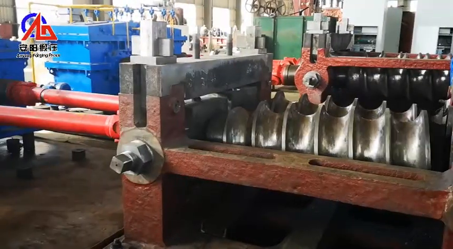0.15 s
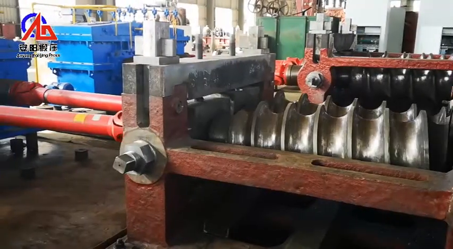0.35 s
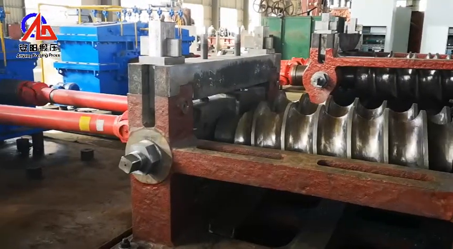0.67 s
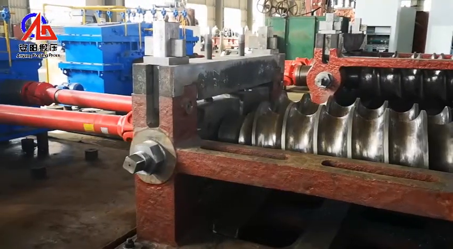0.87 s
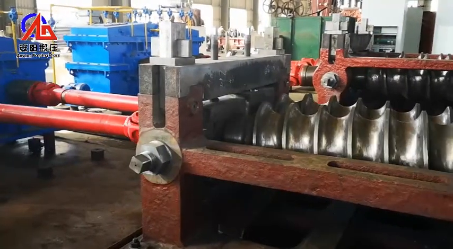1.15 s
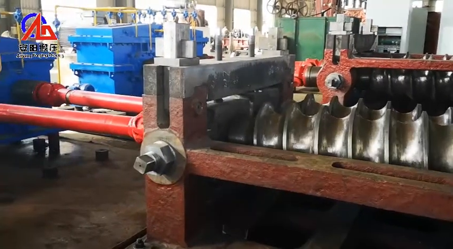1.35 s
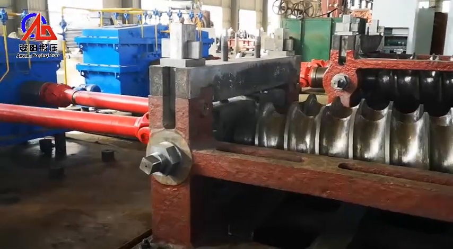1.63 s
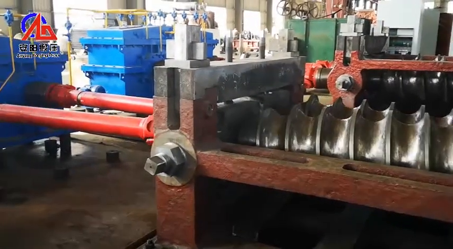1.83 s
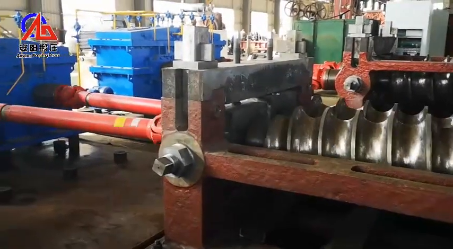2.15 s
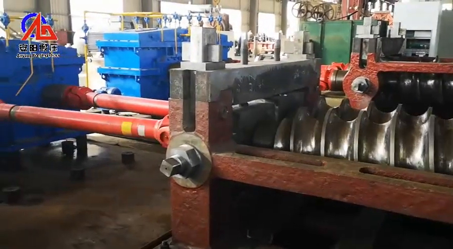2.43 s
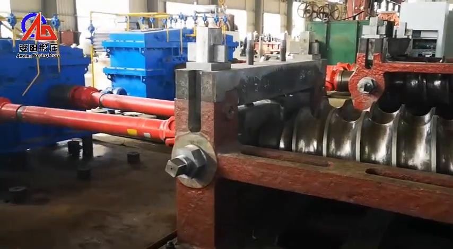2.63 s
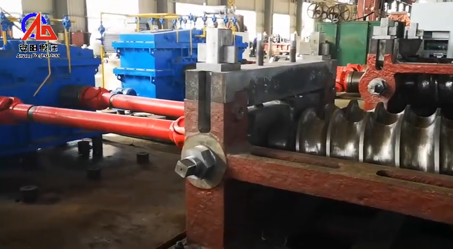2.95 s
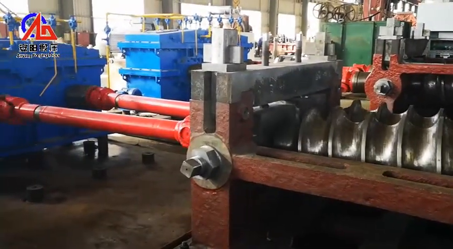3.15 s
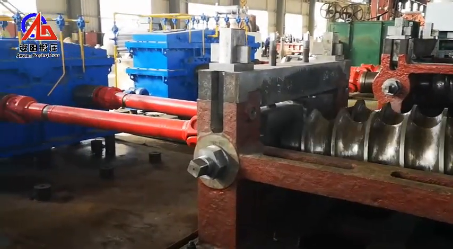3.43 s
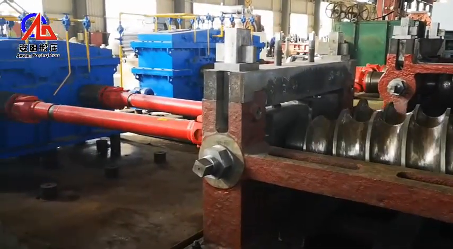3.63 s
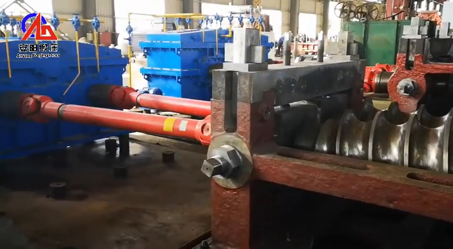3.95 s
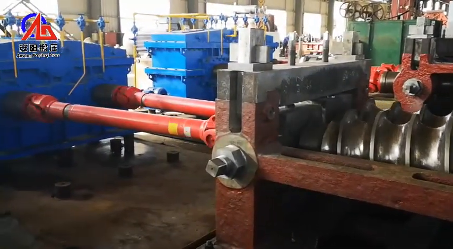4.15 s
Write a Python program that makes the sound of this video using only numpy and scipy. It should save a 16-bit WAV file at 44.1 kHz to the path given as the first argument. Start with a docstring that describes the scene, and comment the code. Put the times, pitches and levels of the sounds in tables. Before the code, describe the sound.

A continuous low mechanical drone with strong electric hum and throbbing gears, heard close beside the machine in a workshop. Gritty steel rubbing swells at each bite of the rolls, slightly to the right, while short chattering knocks ring and die quickly. A steady high whine and wavering whistle sit above, with a soft buzzing hiss on the left. The whine brightens in the second half, knocks thin out, and the mill keeps running.

```python
"""A skew rolling mill for steel balls is already turning steadily in a factory workshop, its gearbox droning.
The motor hums, the drive whines, a thin hiss comes from the left, and the rolls churn on the right.
From 0.12 s the rolls bite about four times a second; loose steel knocks against them from 0.2 s.
The hiss flares once near 0.8 s. The whine's octave is faint around 1 s and swells after 2.3 s.
Knocks grow rarer after 3.2 s, and the mill is still turning at the end."""
import sys
import numpy as np
from scipy import signal
from scipy.fft import rfft, irfft
from scipy.io import wavfile
from scipy.ndimage import uniform_filter1d, map_coordinates

SR = 44100
rng = np.random.default_rng(int(sys.argv[2]) if len(sys.argv) > 2 else 0)


def dump(signal):
    """Clip the signal to [-1, 1] and save it as 16-bit WAV at the path in sys.argv[1]."""
    limited = np.clip(np.atleast_2d(signal).T, -1, 1)
    pcm = np.round(limited * 32767).astype(np.int16)
    wavfile.write(sys.argv[1], SR, pcm)


N = 189056
TIME = np.arange(N) / SR
MAINS_HZ = 50
TURN_S = .24   # one turn of the gear wheel


def from_db(db):
    """Turn decibels into a gain."""
    return 10 ** (np.asarray(db) / 20)


def rms_one(x):
    """Scale to an rms (average strength) of 1."""
    return x / np.sqrt(np.mean(np.abs(x) ** 2) + 1e-20)


def level(curve):
    """Turn a curve of start_s, level_db into a gain for every sample."""
    return from_db(np.interp(TIME, *np.transpose(curve)))


def swells(rows, width_s):
    """Gain that changes smoothly around the time in each row of peak_s, change_db."""
    return from_db(sum(db * np.exp(-((TIME - s) / width_s) ** 2) for s, db in rows))


def at_hz(points, hz):
    """Read a table between its points, with pitch spaced as the ear hears it (logarithmic)."""
    x, y = np.transpose(points)
    return np.interp(np.log(hz + 1e-3), np.log(x), y)


def coloured(x, spectrum):
    """Pass x through a body with this spectrum, falling steeply beyond its ends; rms 1."""
    hz = np.fft.rfftfreq(N, 1 / SR) + 1e-3
    lowest_hz, highest_hz = spectrum[0][0], spectrum[-1][0]
    skirts = np.minimum(1, np.minimum(hz / lowest_hz, highest_hz / hz)) ** 4
    gain = from_db(at_hz(spectrum, hz)) * skirts
    return rms_one(irfft(rfft(x) * gain, N))


def evened(x, span_s):
    """Hold the level of x steady over spans of this length."""
    power = uniform_filter1d(np.mean(x ** 2, axis=0), max(int(span_s * SR), 64))
    return x / np.sqrt(power + 1e-12)


def pan(left_db):
    """Gains of the left and right channels; a positive value favours the left."""
    return from_db(np.array([[.5], [-.5]]) * left_db)


def balanced(pair, balance):
    """Tilt each frequency to the left or right."""
    return irfft(rfft(pair) * pan(at_hz(balance, np.fft.rfftfreq(N, 1 / SR))), N)


def from_right(x, lag_ms=0.581, shadow_hz=3000):
    """Sound from the right reaches the left microphone later and duller."""
    dulled = signal.sosfilt(signal.butter(1, shadow_hz, fs=SR, output="sos"), x)
    return np.array([np.interp(TIME - lag_ms / 1000, TIME, dulled), x])


# How alike the hall's sound is at both ears: pitch_hz, likeness (0-1, no unit)
HALL_LIKENESS = [(30, 0.96), (120, 1), (250, 0.89), (380, 0.74), (550, 0), (900, 0.0071)]


def diffuse(pair):
    """Spread two unrelated signals around as in a hall: alike at both ears in the bass only."""
    alike = at_hz(HALL_LIKENESS, np.fft.rfftfreq(N, 1 / SR))
    mid, side = rfft(pair)
    return irfft(np.sqrt(1 + alike) * mid + np.sqrt(1 - alike) * side * [[1], [-1]], N)


def drift(per_s):
    """Smooth random wander of rms 1."""
    knots = rng.standard_normal(1024)
    wander = map_coordinates(knots, [TIME[::32] * per_s * 2], order=3, mode="wrap")
    return rms_one(wander).repeat(32)[:N]


def tone(hz, unsteady, lead=0, waver_per_s=2.966):
    """A steady or gliding tone that wavers in strength and phase; the left ear leads by lead (radians)."""
    wander = drift(waver_per_s) + 1j * drift(waver_per_s)
    waver = rms_one(1 + unsteady * wander / np.sqrt(2))
    turns = np.cumsum(hz * np.ones(N)) / SR + rng.random()
    line = waver * np.exp(2j * np.pi * turns)
    return np.sqrt(2) * (line * np.exp(1j * lead * np.array([[.5], [-.5]]))).real


def tones(rows, step_hz):
    """A set of tones, each moved to the nearest whole multiple of a step."""
    total = 0
    for hz, db, left_db, lead, unsteady in rows:
        locked_hz = step_hz * round(hz / step_hz)
        total = total + from_db(db) * pan(left_db) * tone(locked_hz, unsteady, lead)
    return total


def mains_buzz():
    """A noisy electric buzz, repeated every mains cycle."""
    cycle = rng.standard_normal((2, round(SR / MAINS_HZ)))
    return cycle[:, np.arange(N) % cycle.shape[1]]


ROLL_TURN_S = .2585   # one turn of the rolls
FIRST_BITE_S, BITE_RISE_S = 0.12, 0.11   # the rolls bite once a turn: when first, and how fast load builds


def under_load(swing_db, lag_s):
    """Gain that follows the load: it builds quickly at each bite and eases over the rest of the turn."""
    age = (TIME - FIRST_BITE_S - lag_s) % ROLL_TURN_S
    load = np.interp(age, [0, BITE_RISE_S, ROLL_TURN_S], [0, 1, 0])
    return from_db(swing_db * (load - .5))


# Colour of the hiss, before it is scaled to its level: pitch_hz, strength_db
HISS_COLOUR = [(2800, -8.5), (3900, 5), (4700, -0.5), (5600, -1.5), (6400, -5), (7100, -1), (7700, 0),
               (8200, -4), (9000, -14), (9600, -10)]
FLARE_S, FLARE_WIDTH_S, FLARE_DB = .79, .018, 4.5


def hiss(level_db=-56.0, buzz_db=-8):
    """Thin noise on the drive side, with an electric buzz every mains cycle; it flares once, briefly."""
    left, right = rng.standard_normal((2, N)) + from_db(buzz_db) * mains_buzz()
    duller_right = signal.lfilter([1], [1, -.55], right)
    sides = np.array([coloured(left, HISS_COLOUR), coloured(duller_right, HISS_COLOUR)])
    flare_db = FLARE_DB * np.exp(-((TIME - FLARE_S) / FLARE_WIDTH_S) ** 2)
    return from_db(level_db + flare_db) * pan(left_db=15.5) * sides


WHINE_HZ = 2311.6   # switching pitch of the drive
# The microphone moves through the standing waves of the whine: start_s, left_right_db, left_lead_rad
WHINE_PLACE = [(.2, -3, -1.7), (.6, -3, -2.4), (.9, 5, -2.6), (1.6, 4, -2.4), (2.3, -4, -3.1),
               (3.0, 7, -1.7), (3.4, 3, -.8), (3.7, -7, -1.3), (4.1, -7, -1.4)]
# Overtones of the whine: multiple (of its pitch), level_db (rms), left_right_db, left_lead_rad,
# unsteadiness (0-1)
WHINE_OVERTONES = [(3, -64, 5.5, 3.8, 0.6), (3.5, -72, 16, 5, 0.4)]
# Rise and fall of the whine's octave, before its trim: start_s, level_db
OCTAVE_LEVEL = [(0, -61), (.35, -57), (.7, -59), (1.0, -68), (1.45, -67), (1.65, -61), (2.05, -60),
                (2.3, -57.5), (2.65, -52.5), (3.3, -49.5), (4.29, -52)]
# Rise and fall of the whine's fourth multiple: start_s, level_db
FOURTH_LEVEL = [(0, -75), (.3, -70.5), (.9, -72), (1.1, -76), (2.0, -84), (2.7, -74), (3.7, -84),
                (4.29, -80)]
# Rise and fall of the high whistle, before its trim: start_s, level_db
WHISTLE_LEVEL = [(.05, -60.5), (.25, -60.5), (.45, -64), (.62, -59.5), (.79, -61.5), (.96, -56),
                 (1.06, -68), (1.2, -61.5), (1.62, -70), (1.75, -59.5), (1.92, -62), (2.1, -65),
                 (2.38, -59.5), (2.7, -63.5), (3.02, -59), (3.17, -69), (3.45, -63), (3.55, -68),
                 (3.75, -62), (3.94, -74), (4.1, -57), (4.29, -66)]
# Wandering pitch of the high whistle: start_s, pitch_hz
WHISTLE_PITCH = [(.15, 7339), (.4, 7329), (.7, 7338), (.95, 7334), (2.13, 7334), (2.22, 7351), (2.5, 7353),
                 (2.75, 7330), (3.75, 7332), (4.29, 7335)]


def drive(pitch_db=-45.0, octave_trim_db=0.5, whistle_trim_db=-2.0):
    """Switching makes a whine that shifts between the ears, with uneven overtones and a wandering whistle."""
    place_s, *columns = np.transpose(WHINE_PLACE)
    left_db, lead = (np.interp(TIME, place_s, column) for column in columns)
    whine = from_db(pitch_db) * pan(left_db) * tone(WHINE_HZ, unsteady=0, lead=lead)

    overtone_rows = [(multiple * WHINE_HZ, *rest) for multiple, *rest in WHINE_OVERTONES]
    overtones = tones(overtone_rows, WHINE_HZ / 2)

    octave = tone(2 * WHINE_HZ, unsteady=0.14, lead=2.7, waver_per_s=9.0)
    octave = from_db(octave_trim_db) * level(OCTAVE_LEVEL) * pan(left_db=8.5) * octave
    fourth = level(FOURTH_LEVEL) * pan(left_db=6) * tone(4 * WHINE_HZ, unsteady=.25)

    whistle_hz = np.interp(TIME, *np.transpose(WHISTLE_PITCH))
    whistle = tone(whistle_hz, unsteady=0.18, waver_per_s=9.0)
    whistle = from_db(whistle_trim_db) * level(WHISTLE_LEVEL) * pan(left_db=12.0) * whistle
    return whine + overtones + octave + fourth + whistle


# Mains hum: pitch_hz, level_db (rms), left_right_db, left_lead_rad, unsteadiness (0-1)
HUM = [(50, -48.5, 0, 0, .1), (150, -36, 0, 0, .4), (200, -46.5, 0, 0, .3), (400, -49.5, -5, -.9, .4),
       (1200, -64, -5, .9, .3), (1400, -61, 2, .4, .3), (1500, -55, 2, -1.4, .3), (1750, -59.5, 1, -.2, .3),
       (1800, -53, 1, .2, .4), (1850, -62, -10, -.6, .4), (2000, -54, -5, -1.8, .2),
       (5200, -80, 20, -1.6, .2)]
# Tones of shafts and gears, moved to the nearest multiple of the wheel's turning rate when played:
# pitch_hz, level_db (rms), left_right_db, left_lead_rad, unsteadiness (0-1)
GEAR_TONES = [(25, -41.6, 0, 0, .12), (46, -44, 0, 0, .3), (79, -45, 0, 0, .5), (96, -46.5, 0, 0, .3),
              (146, -46, 0, 0, .4), (162, -46.5, 0, 0, .4), (167, -46.5, 0, 0, .4), (179, -44.5, 0, 0, .3),
              (204, -46.5, 0, 0, .4), (212, -47, 0, 0, .5), (225, -45, 0, 0, .4), (246, -46, 0, .3, .4),
              (333, -45.3, 0, 0, .3), (425, -58, 6, -.2, .2), (438, -58, -5, .3, .2), (517, -54, 7, -2, .3),
              (721, -63, 15, 1.1, .2), (1333, -64, 1, -.2, .3), (2475, -58.5, -3, 1.5, .5),
              (3671, -66, -2, .4, .6), (4325, -72.5, 4, -.2, .3), (4400, -73, 0, -.7, .3),
              (4925, -75.5, 20, -1.4, .2)]
# Rise and fall of the hum's fifth harmonic, before its trim: start_s, level_db
FIFTH_LEVEL = [(.1, -33), (.45, -35), (.8, -39.5), (1.7, -41), (2.3, -37.5), (3.0, -37.5), (4.29, -37.5)]
# Rise and fall of the hum's sixth harmonic, before its trim: start_s, level_db
SIXTH_LEVEL = [(.1, -33), (.25, -38), (.38, -34.5), (.55, -49.5), (1.65, -53.5), (2.2, -42.5), (2.5, -40.5),
               (3.3, -36.5), (4.25, -36)]


def motor(fifth_trim_db=2.5, sixth_trim_db=2.0):
    """Magnetic hum on multiples of the mains, with a changing fifth and sixth, plus shaft and gear tones."""
    fifth = from_db(fifth_trim_db) * level(FIFTH_LEVEL) * tone(5 * MAINS_HZ, unsteady=0.099)
    sixth = from_db(sixth_trim_db) * level(SIXTH_LEVEL) * tone(6 * MAINS_HZ, unsteady=0.35)
    return fifth + sixth + tones(HUM, MAINS_HZ) + tones(GEAR_TONES, 1 / TURN_S)


def band(x, low_hz, high_hz):
    """Keep only the sound between two pitches."""
    return signal.sosfilt(signal.butter(2, [low_hz, high_hz], "band", fs=SR, output="sos"), x)


# What the rattling steel rings with: pitch_hz, strength_db, t60_s (time to fade by 60 dB)
STEEL = [(1080, -10.5, .07), (1830, -7, .04), (1906, -9.5, .04), (2020, -7.5, .027), (2330, -0.5, 0.059),
         (2562, 2, 0.05), (2642, -1.5, 0.06), (2985, 2.5, 0.031), (3074, -6.5, 0.039), (3316, 2, 0.05),
         (3425, -2.5, 0.051), (3620, -9.5, 0.052), (4200, -16.5, 0.057)]


def steel_ring(contacts):
    """Each contact sets the steel's resonances ringing, and they die away."""
    rings = 0
    for k, (hz, db, t60_s) in enumerate(STEEL):
        decay = from_db(-60 / (t60_s * SR))   # per sample
        angle = 2 * np.pi * hz / SR
        feedback = [1, -2 * decay * np.cos(angle), decay * decay]
        sign = (-1) ** k
        rings = rings + sign * from_db(db) * signal.lfilter([1, 0, -1], feedback, contacts)
    return rings


# Knocks of steel on the rolls: start_s, level_db (rms of the first 40 ms, before panning and echo),
# chatter_s, clatter_db (dull clatter against the ring)
RATTLES = [(.208, -36.5, 0.02, 2), (0.264, -50, .014, 3), (.448, -39.5, 0.017, 3.5),
           (.689, -36.5, 0.015, 8), (.73, -44, .014, -3), (.905, -42, .012, 6), (.974, -33.5, 0.0068, -1.5),
           (0.983, -37, 0.011, -4), (1.008, -45, 0.023, 12), (1.085, -38, 0.0097, -4),
           (1.22, -38.5, .012, 1), (1.247, -39.5, 0.018, 3.5), (1.529, -35.5, 0.02, -2),
           (1.565, -37, 0.011, 3.5), (1.7636, -38, 0.0097, -3), (1.8082, -39, 0.014, 0),
           (2.044, -36, 0.013, -3.5), (2.291, -41, .012, -1), (2.3181, -36.5, 0.01, -0.5),
           (2.364, -39, .012, -10), (2.4, -43, .015, -8), (2.559, -36.5, .012, 3), (2.581, -38.5, 0.011, 7),
           (2.775, -39.5, .011, -2), (2.9231, -36.5, .012, 1.5), (3.028, -40, 0.014, -1),
           (3.16, -40, 0.013, 0), (3.57, -41.5, .012, -2), (4.046, -34.5, 0.011, -1.5),
           (4.09, -37, .012, -7)]
RATTLE_TOP_HZ, DULLING_OCT_PER_DB = 3900, .055   # top at 0 dB of clatter; more clatter lowers it


def rattle(body_hz=2150, crack_db=-4, crack_hz=3300, hall_db=-10.5, hall_t60_s=0.4):
    """Knocks are short chatters of contacts that crack, clatter on guides, ring steel and echo in the hall."""
    age = TIME[:SR // 6]
    chatter_s = np.array(RATTLES)[:, 2:3]
    shape = (len(RATTLES), len(age))
    hits = rng.random(shape) < 1500 / SR   # about 1500 contacts per second
    contacts = rng.standard_normal(shape) * hits * np.exp(-age / chatter_s) + 1e-18
    cracks = band(contacts, crack_hz / 1.2, crack_hz * 1.2)
    bodies = band(contacts, body_hz / 1.3, body_hz * 1.3)
    rings = steel_ring(contacts)

    knocks = np.zeros(N + SR)
    for (start_s, db, _, body_db), ring, crack, body in zip(RATTLES, rings, cracks, bodies):
        start = round(start_s * SR)
        knock = rms_one(ring) + from_db(crack_db) * rms_one(crack) + from_db(body_db) * rms_one(body)
        top_hz = RATTLE_TOP_HZ * 2 ** (-DULLING_OCT_PER_DB * body_db)
        knock = signal.sosfilt(signal.butter(4, top_hz, fs=SR, output="sos"), knock)
        knocks[start:start + len(age)] += from_db(db) * knock / np.std(knock[age < .04])

    echoes = rng.standard_normal((2, SR)) * from_db(-60 * TIME[:SR] / hall_t60_s)
    echoes = echoes / np.linalg.norm(echoes[0])
    hall = signal.fftconvolve(knocks[None], echoes, axes=1)[:, :N]
    return pan(left_db=-4.0) * (from_right(knocks[:N]) + from_db(hall_db) * hall)


# Resonances of the rolls: pitch_hz, level_db (rms, before the load moves it), wavers_per_s,
# left_right_db, left_lead_rad
ROLL_RINGS = [(970, -63.5, 31, -1.5, -3.3), (1096, -56, 28, -2.5, -0.5), (1750, -57, 13, -2, 1.3),
              (1930, -52, 34, -2.5, -4), (2280, -53, 40, -4, -3.5)]


def ringing():
    """The rubbing keeps a few resonances of the rolls singing, louder at each bite."""
    strands = 0
    for hz, db, waver, left_db, lead in ROLL_RINGS:
        strand = tone(hz, unsteady=5.5, lead=lead, waver_per_s=waver)
        strands = strands + from_db(db) * pan(left_db) * strand
    return under_load(swing_db=11.5, lag_s=0.033) * strands


def grit(per_s=110, spread_db=2.5, bite_s=0.0013):
    """Tiny high spots on the steel snap at random, each a small burst of its own size; rms 1."""
    snaps = rng.random(N) < per_s / SR
    sizes = snaps * from_db(spread_db * np.minimum(rng.exponential(1, N), 3))
    bursts = signal.lfilter([1], [1, -np.exp(-1 / (bite_s * SR))], sizes + 1e-18)
    return rms_one(bursts * rng.standard_normal(N))


def rubbing(direct_db, buzz_db, grain_db):
    """Steel catches on steel in uneven grains, heard directly and through the hall, with motor buzz."""
    hall = diffuse(rng.standard_normal((2, N)) + from_db(buzz_db) * mains_buzz())
    grains = rms_one(rng.standard_normal(N) * from_db(grain_db * drift(per_s=35)))
    return hall + from_db(direct_db) * from_right(grains)


# Colour of the churning, before it is scaled to its level: pitch_hz, strength_db
CHURN_COLOUR = [(1000, -25.5), (1400, -9), (1650, -3), (1850, -1), (2050, -0.5), (2220, -1.5), (2400, -0.5),
                (2680, -2), (2900, -6), (3400, -10), (3750, -16.5), (4600, -27), (6500, -30), (9000, -40.5)]
# Where the churning is heard: pitch_hz, left_right_db
CHURN_BALANCE = [(1400, -5.5), (1800, -3), (2200, -2.5), (2900, -7.5), (3500, -3.5), (4600, -2.5),
                 (6500, -2.5), (9000, 4.5)]
# Level of the churning, before the grinds and the balance: start_s, level_db
CHURN_LEVEL = [(.05, -36.5), (.7, -35.5), (1.1, -35), (2.1, -36), (2.7, -35), (3.4, -36), (3.9, -36),
               (4.29, -34.5)]
# The rolls grind harder at each bite: peak_s, change_db
GRINDS = [(.26, 1.5), (.48, 0), (.77, 1.5), (1.0, 2.5), (1.29, 1), (1.56, 2), (1.78, 1.5), (2.05, 1),
          (2.33, 2.5), (2.55, 0.1), (2.84, 2), (3.07, 0.7), (3.35, 1.3), (3.59, 1), (3.83, 1.7),
          (4.12, 0.8)]
# Colour of the heavy bed's rumbling, before it is scaled to its level: pitch_hz, strength_db
BED_COLOUR = [(380, -4), (520, -2.5), (640, 1), (740, 3), (860, 3.5), (980, 4), (1180, 1), (1350, -3),
              (1700, -17)]


def rolls(bed_db=-41.0, grit_db=-5.5):
    """The rolls churn and crunch in their guides and set the heavy bed rumbling, harder at each bite."""
    contact = rubbing(direct_db=0.5, buzz_db=-9.0, grain_db=2.0)
    contact = contact + from_db(grit_db) * from_right(grit())
    churn_gain = level(CHURN_LEVEL) * swells(GRINDS, width_s=0.062)
    churn = churn_gain * balanced(coloured(contact, CHURN_COLOUR), CHURN_BALANCE)

    bed = coloured(rubbing(direct_db=-5.0, buzz_db=-7.0, grain_db=6.0), BED_COLOUR)
    bed_gain = from_db(bed_db) * under_load(swing_db=2.5, lag_s=0.0037)
    return churn + bed_gain * pan(left_db=2.5) * bed


def meshing(repeat, memory):
    """The same tooth errors come round every turn; a share of them changes slowly from turn to turn."""
    size = round(TURN_S * SR)
    turns = rng.standard_normal((2, N // size + 12, size))
    same = turns[:, :1]
    changing = rms_one(signal.lfilter([1], [1, -memory], turns[:, 1:], axis=1))
    mixed = np.sqrt(repeat) * same + np.sqrt(1 - repeat) * changing
    return diffuse(mixed.reshape(2, -1)[:, -N:])


# Colour of the casing's low throb, before it is scaled to its level: pitch_hz, strength_db
THROB_COLOUR = [(85, -13), (112, -11), (128, -3.5), (148, -2), (172, -3), (188, -12), (205, -3.5),
                (228, -4.5), (245, -27.5), (280, -37.5)]
# Level of the throb, before its trim, load and surges: start_s, level_db
THROB_LEVEL = [(.2, -25.5), (1.0, -32.5), (1.5, -27.5), (2.0, -30.5), (2.4, -29), (2.9, -30.5), (3.4, -30),
               (4.29, -30)]
# Surges of the throb: peak_s, change_db
SURGES = [(.22, 3), (.53, 6.5), (.8, 5.5), (1.1, 2), (1.3, 2.5), (1.53, 2.5), (1.63, 1), (1.9, 3.5),
          (2.05, 0.5), (2.37, 4), (2.56, -1), (2.86, 5.5), (3.1, 5), (3.32, 8), (3.87, 5), (4.11, 1)]
# Colour of the stiffer panels' growl, before it is scaled to its level: pitch_hz, strength_db
GROWL_COLOUR = [(205, -11), (240, -5.5), (275, 2.5), (325, 2), (342, -3.5), (360, -11.5), (415, -9),
                (460, -9.5), (530, -14), (640, -19)]
# Level of the growl, before its trim and load: start_s, level_db
GROWL_LEVEL = [(0, -30.5), (.45, -28.5), (.75, -29), (1.3, -29.5), (2.0, -30.5), (2.4, -29.5), (3.1, -29.5),
               (3.8, -31), (4.29, -33.5)]
# Colour of the foundation's rumble, before it is scaled to its level: pitch_hz, strength_db
RUMBLE_COLOUR = [(12, -14.5), (25, -5.5), (38, -12.5), (50, 5.5), (62, 2.5), (78, -2.5), (100, 1.5),
                 (125, -12), (170, -36.5)]


def gearbox(throb_trim_db=-2.0, growl_trim_db=-4.0, rumble_db=-41.0):
    """Tooth forces shake foundation, casing and stiffer panels; the panels growl most as the load eases."""
    throb_gain = from_db(throb_trim_db) * level(THROB_LEVEL) * under_load(swing_db=2.5, lag_s=0.0058)
    throb_gain = throb_gain * swells(SURGES, width_s=0.027)
    casing = evened(coloured(meshing(repeat=0.24, memory=0.44), THROB_COLOUR), span_s=0.16)

    growl_gain = from_db(growl_trim_db) * level(GROWL_LEVEL) * under_load(swing_db=-4.0, lag_s=0.023)
    panels = evened(coloured(meshing(repeat=0.21, memory=0.45), GROWL_COLOUR), span_s=0.19)

    foundation = from_db(rumble_db) * coloured(meshing(repeat=0.5, memory=0.45), RUMBLE_COLOUR)
    return throb_gain * casing + growl_gain * panels + foundation


def scene():
    """The whole mill, heard from beside its frame."""
    return hiss() + drive() + motor() + rattle() + ringing() + rolls() + gearbox()


CUTOFF_HZ = 9400


def record(dry):
    """Cut the top steeply above the cutoff."""
    return signal.sosfilt(signal.ellip(10, .1, 80, CUTOFF_HZ, fs=SR, output="sos"), dry)


dry = scene()
out = record(dry)
dump(out)
```